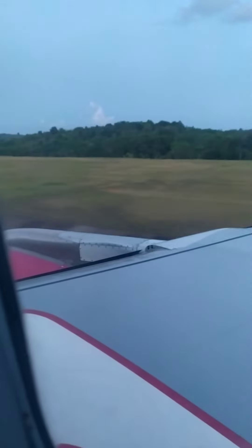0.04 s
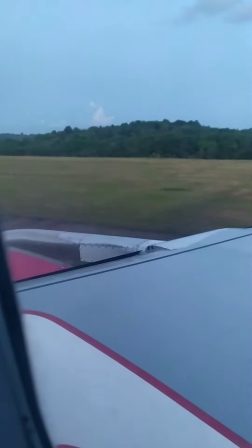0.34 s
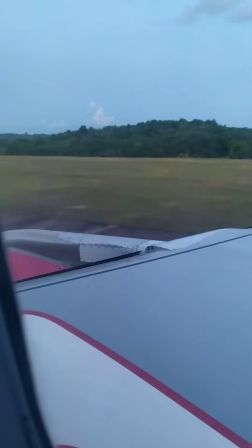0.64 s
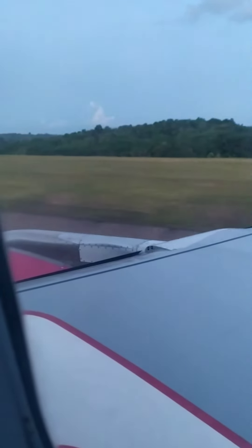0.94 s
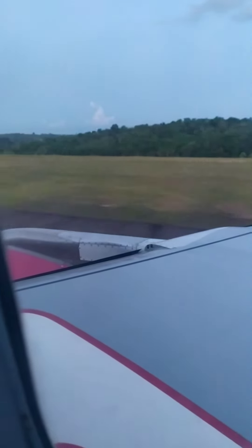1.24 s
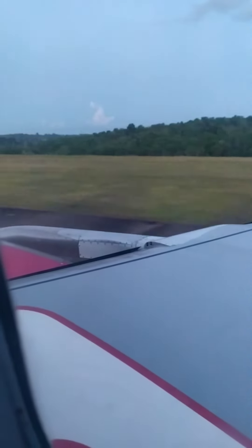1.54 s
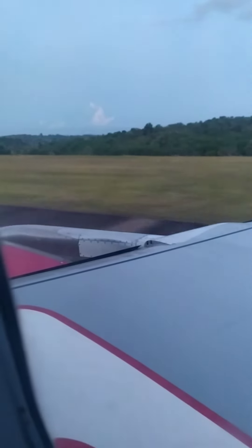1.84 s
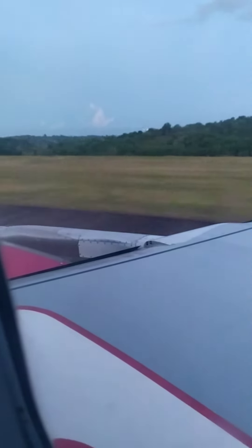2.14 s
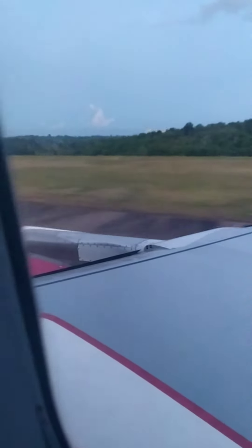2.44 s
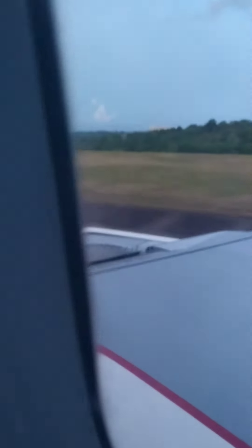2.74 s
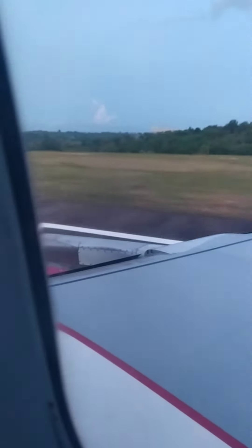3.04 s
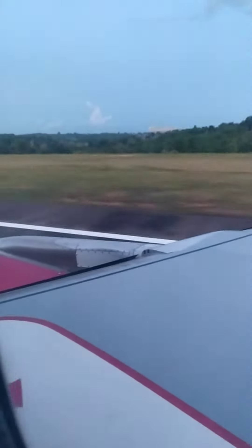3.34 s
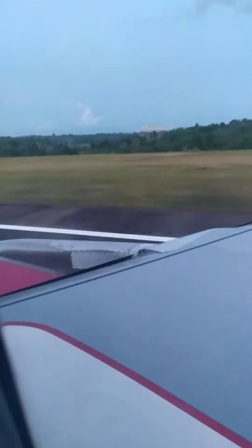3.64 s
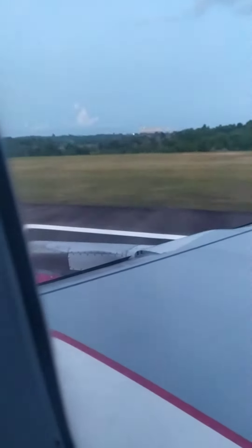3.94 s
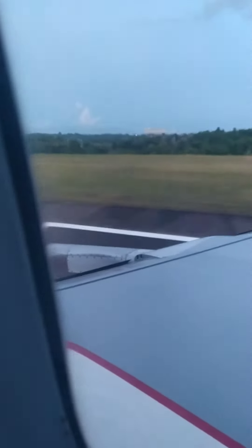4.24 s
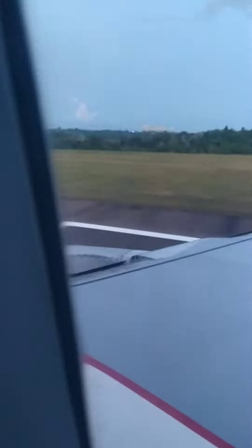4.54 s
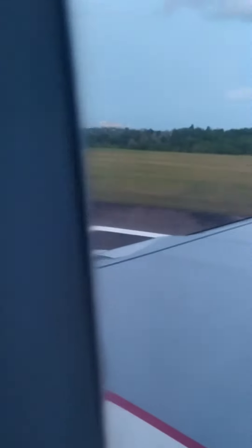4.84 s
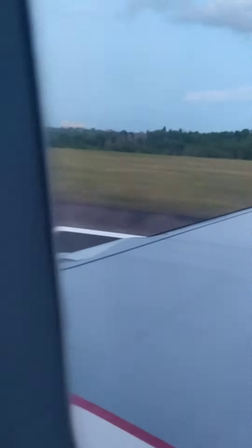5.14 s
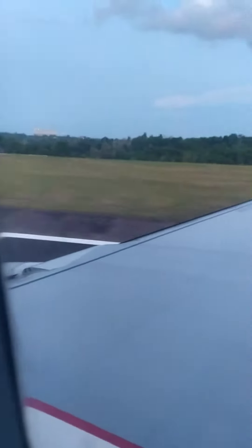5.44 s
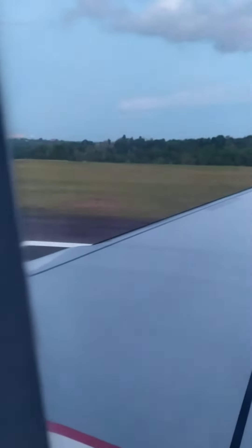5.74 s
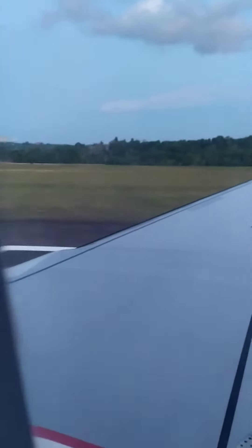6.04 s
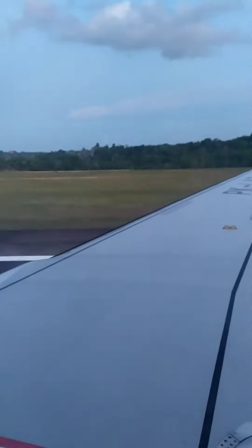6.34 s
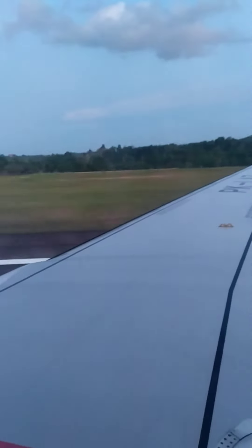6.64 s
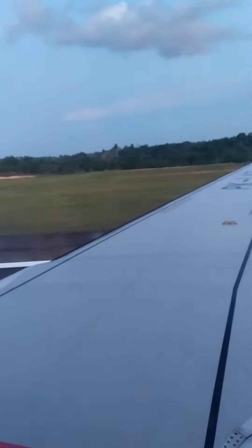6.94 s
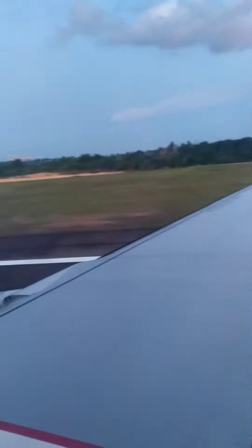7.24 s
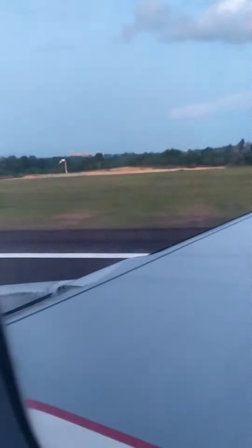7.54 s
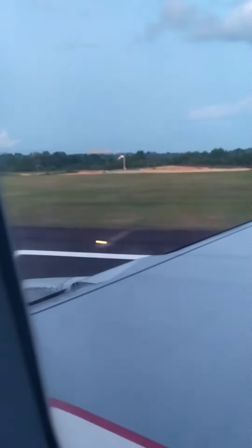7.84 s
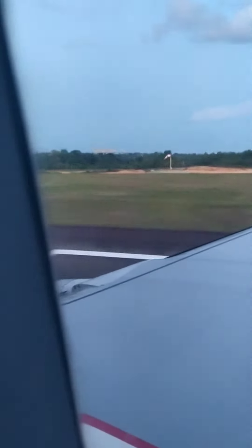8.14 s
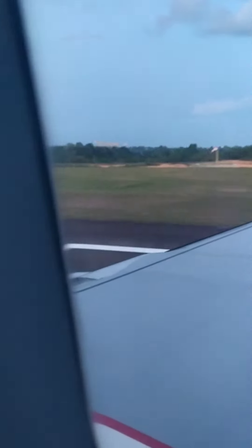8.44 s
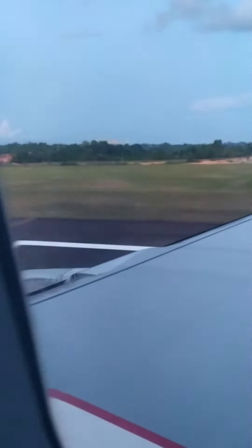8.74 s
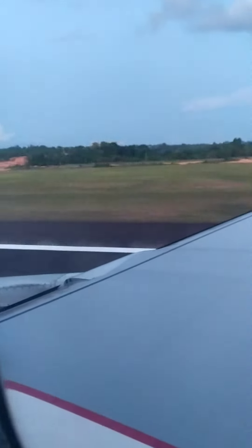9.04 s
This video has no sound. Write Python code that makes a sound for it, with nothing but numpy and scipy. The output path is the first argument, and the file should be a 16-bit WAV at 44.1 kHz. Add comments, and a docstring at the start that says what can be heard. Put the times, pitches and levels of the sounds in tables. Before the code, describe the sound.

Inside a jet airliner, a low cabin drone carries a faint whine of engine fans. After about two seconds the wheels touch down with a cluster of deep thumps and jolts. A louder runway rumble follows, with plastic trim rattling and knocking. The fan whine rises and the exhaust swells into a roar, while the microphone, at a seat over the wing, crackles slightly from overload.

```python
"""A steady cabin drone with whining engine fans, heard from a seat over the wing of a landing jet airliner.
The wheels touch down with jolts and thumps, the runway rumbles, and the plastic trim rattles and knocks.
Then the engines speed up and their exhaust swells into a roar. The plane's body shudders too deeply
to hear, but the shudder overloads the microphone, which crackles and chops up the treble."""
import sys
import numpy as np
from scipy import signal
from scipy.fft import rfft, irfft, next_fast_len
from scipy.io import wavfile
from scipy.ndimage import uniform_filter1d, minimum_filter1d, map_coordinates

SR = 44100
rng = np.random.default_rng(int(sys.argv[2]) if len(sys.argv) > 2 else 0)


def master(y):
    """Save y as 16-bit WAV."""
    cut = np.clip(np.atleast_2d(y).T, -1, 1)
    pcm = np.round(cut * 32767)  # scale
    wavfile.write(sys.argv[1], SR, pcm.astype(np.int16))


N = 409686
TIME = np.arange(N) / SR
LIGHT_LOAD_DB = -7  # weaker shaking until the plane's weight settles on the wheels


def amp(db):
    """Turns decibels into a number to multiply a sound by."""
    return 10 ** (np.asarray(db) / 20)


def unit(x):
    """Scales a signal to an average strength (rms) of one."""
    return x / np.sqrt(np.mean(x ** 2) + 1e-20)


def read(points, hz):
    """Looks up a spectrum table at any frequency, sliding between rows on a log-frequency scale."""
    row_hz, value = np.transpose(points)
    return np.interp(np.log(hz + 1), np.log(row_hz + 1), value)


def curves(rows):
    """Joins the rows of a time table with straight lines: one curve for each value column."""
    times, *columns = np.transpose(rows)
    return [np.interp(TIME, times, column) for column in columns]


def colour(x, points):
    """Turns each frequency of a sound up or down as a spectrum table says."""
    return irfft(rfft(x) * amp(read(points, np.fft.rfftfreq(x.shape[-1], 1 / SR))), x.shape[-1])


def waver(rate_hz):
    """A smooth random wobble of strength one, with rate_hz new values a second."""
    knots = rng.standard_normal(4096)
    wobble = map_coordinates(knots, [TIME[::64] * rate_hz], order=3, mode="wrap")
    return unit(wobble).repeat(64)[:N]


def swell(start, hold, rise, fall):
    """A loudness shape that rises, holds, then dies away; all times in seconds."""
    t = TIME - start
    return np.clip(t / rise, 0, 1) * np.exp(-np.maximum(t - hold, 0) / fall)


def add(mix, start, sound):
    """Mixes a short sound in at a start time in seconds."""
    part = mix[:, max(round(start * SR), 0):][:, :sound.shape[1]]
    part += sound[:, :part.shape[1]]


def air(gain):
    """Noise at two microphones, shaped by gain(hz): alike in the bass, unrelated in the treble."""
    # what differs between the microphones (side) against what they share (mid): (frequency [Hz], level [dB])
    width = [(60, -24), (110, -20.5), (200, -19.5), (380, -6), (700, -1.5), (1290, 3), (2380, -1.5),
             (4400, 1), (8120, 0), (15000, 1)]
    # how much louder the left is than the right: (frequency [Hz], level [dB])
    balance = [(60, -0.5), (110, 0.5), (200, -0.5), (380, 0.5), (700, -3), (1290, -2.5), (2380, 0.5),
               (4400, 2), (8120, 0.5), (15000, 2.5)]
    size = next_fast_len(N, real=True)
    hz = np.fft.rfftfreq(size, 1 / SR)
    mid, side = rfft(rng.standard_normal((2, size))) * gain(hz)
    side = side * amp(read(width, hz))
    lean = amp(read(balance, hz) / 2)
    pair = irfft(np.array([(mid + side) * lean, (mid - side) / lean]), size)[:, :N]
    return pair / pair.mean(0).std()


def noise(spectrum):
    """Stereo noise with the tone colour of a spectrum table."""
    return air(lambda hz: amp(read(spectrum, hz)))


def resonance(centre_hz, width_hz):
    """A narrow band of noise, like something shaken that rings near one pitch."""
    return air(lambda hz: 1 / (1 + ((hz - centre_hz ** 2 / (hz + 1)) / width_hz) ** 4))


def load(light_db, touchdown_s=2.31, settle_s=4.9, ramp_s=0.11):
    """How hard the wheels shake the plane: zero in the air, light at first, one once the weight settles."""
    rolling = np.clip((TIME - touchdown_s) / ramp_s, 0, 1)
    still_light = np.clip(1 - (TIME - settle_s) / ramp_s, 0, 1)
    return rolling * amp(light_db * still_light)


def cabin(drone_db=-16.5, hiss_db=-42, flutter_db=0.5):
    """Airflow and engines come through the cabin wall as a steady drone and a hiss."""
    # tone colour of the low drone: (frequency [Hz], level [dB])
    drone_colour = [(25, -26), (40, 1), (68, -1), (90, 1.5), (135, -1.5), (170, -3), (215, -9),
                    (280, -10.5), (380, -17), (460, -24), (520, -20.5), (600, -32), (800, -68),
                    (1300, -120)]
    # tone colour of the air hiss: (frequency [Hz], level [dB])
    hiss_colour = [(350, -37), (600, -3), (800, -3.5), (1000, -10.5), (1270, -15.5), (1450, -16.5),
                   (2070, -18), (2280, -21), (3400, -25), (4200, -22), (5200, -31), (9000, -31.5),
                   (12800, -39.5), (15500, -61)]
    drone = amp(drone_db) * noise(drone_colour)
    hiss = amp(hiss_db) * noise(hiss_colour)
    return drone + hiss * amp(flutter_db * waver(17))


def fans():
    """The engines' fan blades sing at a pitch that follows their speed; a pump and the vents whine too."""
    # the fans slow to idle, then speed up: (time [s], blade pitch [Hz])
    fan_speed = [(0, 435.5), (0.7, 427), (1.7, 414.8), (2.2, 410.4), (3.1, 409), (4.25, 409.2),
                 (4.45, 413.5), (4.68, 415.5), (5.0, 425), (5.95, 448.6), (7.1, 485.5), (7.5, 504)]
    # the blades' lowest tone: (time [s], level [dB])
    fan_tone = [(0, -31), (0.35, -36.5), (0.7, -26), (1.3, -36), (1.7, -32), (2.3, -34), (3.3, -43.5),
                (4.3, -53), (4.4, -32), (4.68, -33.5), (4.77, -39), (4.9, -35), (5.12, -38), (5.5, -60),
                (5.95, -38), (6.6, -47), (7.1, -30.5), (7.4, -60)]
    # tones at two and three times that pitch: (time [s], second tone [dB], third tone [dB])
    overtones = [(0, -45.5, -59), (0.7, -49, -59), (1.4, -45.5, -50), (2.2, -53, -59), (2.9, -45, -65),
                 (3.3, -46, -66), (3.9, -50, -67), (4.25, -44, -68), (4.5, -51, -68), (5.1, -49.5, -69),
                 (7.5, -66, -80)]
    # a pump's whine, which sags after touchdown: (time [s], pitch [Hz], level [dB])
    pump = [(0, 914, -50), (1, 915.5, -48), (2.6, 915.5, -47), (3.0, 908, -54), (3.25, 886, -48),
            (4.0, 890, -50), (5.5, 900, -58), (6.9, 915, -52), (7.5, 915, -52), (8, 915, -64)]
    # faint steady whines of the ventilation: (pitch [Hz], level [dB])
    whines = [(511.4, -48.5), (1550, -67.5), (1830, -69), (2751, -75), (3661, -74.5), (3741, -72.5),
              (3793, -73), (4167, -76)]
    blade_turns = np.cumsum(curves(fan_speed)[0]) / SR
    blade_levels = curves(fan_tone) + curves(overtones)
    pump_hz, pump_db = curves(pump)
    tones = [(k * blade_turns, db) for k, db in enumerate(blade_levels, 1)]
    tones += [(np.cumsum(pump_hz) / SR, pump_db)]
    tones += [(hz * TIME, db) for hz, db in whines]
    out = np.zeros((2, N))
    for turns, db in tones:
        angle = 2 * np.pi * turns + .12 * waver(14)
        mic_phase = rng.uniform(-.4, .4, (2, 1))  # the wave meets the two microphones out of step
        out += np.sqrt(2) * amp(db + waver(8)) * np.sin(angle + mic_phase)
    return out


def whistles(wobble=0.0043):
    """A squeak and brief whistles: unsteady tones that swell and fade."""
    # one tone a row: (time [s], length [s], pitch [Hz], level [dB])
    tones = [(2.435, 0.09, 3360, -51), (2.438, 0.083, 6600, -58), (6.994, 0.25, 1326, -49.5),
             (7.254, 0.26, 1322, -45.5)]
    out = np.zeros((2, N))
    for start, length, hz, db in tones:
        size = round(length * SR)
        turns = np.cumsum(hz * (1 + wobble * waver(150)[:size])) / SR
        add(out, start, amp(db) * np.sqrt(2) * np.sin(2 * np.pi * turns)[None] * np.hanning(size))
    return out


def wheels():
    """The wheels, suddenly set spinning, hum until the weight settles on them."""
    # loudness of the hum: (time [s], level [dB])
    hum = [(2.3, -70), (2.72, -34), (3.0, -44), (3.45, -33), (3.75, -42), (4.15, -35.5), (4.5, -60)]
    return amp(curves(hum)[0]) * resonance(centre_hz=344.3, width_hz=17)


def tyres(rough_db=2):
    """The tyres drum on the uneven runway, heard through the floor."""
    # loudness of the drumming: (time [s], level [dB])
    level = [(2.3, -46), (2.45, -22), (2.95, -42), (3.2, -35), (3.45, -29), (3.9, -33), (4.6, -30.5),
             (5.2, -31.5), (6, -32.5), (6.6, -28.5), (7.4, -28.5), (9.29, -19.5)]
    # its tone colour: (frequency [Hz], level [dB])
    tyre_colour = [(80, -33.5), (170, 4.5), (260, -11), (360, -10), (520, -12), (760, -19.5), (1100, -29),
                   (2200, -38.5), (6000, -52), (15000, -82)]
    return amp(curves(level)[0] + rough_db * waver(60)) * noise(tyre_colour)


def trim_rattle(chatter_db=2.1, tick_db=-6, ticks_per_s=100, spread_db=2.0, rustle_db=-52):
    """Shaken trim and seats rub and tick in fits, and rustle softly as long as the wheels roll."""
    # fits of rattling: (time [s], held for [s], level [dB])
    rattles = [(1.06, 0.21, -53.5), (2.36, 0.16, -47), (2.56, 0.11, -45.5), (2.705, 0.044, -39.5),
               (3.22, 0.23, -47), (4.02, 0.057, -47), (4.18, 0.041, -44), (4.34, 0.093, -45),
               (4.44, 0.25, -45), (4.9, 0.23, -55), (5.26, 0.33, -45.5), (6.07, 0.19, -45.5),
               (6.3, 0.39, -48.5), (7.56, 0.049, -47), (7.98, 0.03, -41.5)]
    # tone colour of the shaken trim: (frequency [Hz], level [dB])
    trim_colour = [(500, -22), (1200, -12), (2200, 7), (3200, 2.5), (4300, 2.5), (5600, 1), (6600, 2.5),
                   (8500, 4), (11000, 0.5), (13500, -5), (15800, -31)]
    rub = unit(rng.standard_normal((2, N)) * amp(chatter_db * waver(90)))
    clicks = (rng.random(N) < ticks_per_s / SR) * amp(spread_db * np.minimum(rng.exponential(1, N), 4))
    tick_tail = rng.standard_normal((2, 512)) * np.exp(-np.arange(512) / SR / 0.0023)
    ticks = unit(signal.oaconvolve(clicks[None], tick_tail, axes=1)[:, :N])
    fits = sum(amp(db) * swell(start, hold, rise=0.0066, fall=0.016) for start, hold, db in rattles)
    rustle = np.sqrt(load(LIGHT_LOAD_DB)) * amp(rustle_db - 2.5 * waver(21))
    return np.hypot(fits, rustle) * unit(colour(rub + amp(tick_db) * ticks, trim_colour))


def clatter(spectrum, length, rise):
    """A burst of noise that rises fast, then fades unevenly, by 60 dB in length seconds."""
    t = np.arange(16384) / SR
    contacts_db = 3 * np.interp(t, t[::128], rng.standard_normal(128))
    shape = (1 - np.exp(-t / rise)) * amp(-60 * t / max(length, .005) + contacts_db)
    return unit(colour(rng.standard_normal((2, len(t))), spectrum)) * shape


def knocks_and_crackles():
    """Sharp clicks with a hollow body: panel knocks, and small crackles as the microphone overloads."""
    # one knock or crackle a row: (time [s], click level [dB], body against click [dB], length [s])
    clicks = [(0.99, -53, 14, 0.08), (1.11, -36, -11, 0.1), (2.4, -47.5, 1, 0.2), (2.575, -33.5, -4, 0.068),
              (2.614, -39, -1, 0.14), (2.714, -22, -13, 0.038), (2.767, -54, 7, 0.078),
              (2.913, -34.5, 7.5, 0.051), (3.115, -50.5, 16, 0.043), (3.366, -35, -12, 0.08),
              (3.417, -38, -10, 0.067), (3.47, -50, 8, 0.11), (3.994, -37.5, -2, 0.092),
              (4.122, -34, -9, 0.04), (4.467, -36, 5, 0.14), (4.564, -41, 7, 0.026),
              (4.583, -33.5, 7, 0.048), (4.724, -32.5, 7, 0.055), (4.923, -43, 8.5, 0.09),
              (4.954, -46, 7, 0.04), (4.983, -42, 12, 0.07), (5.003, -28.5, 3.5, 0.11),
              (5.039, -43, 9, 0.036), (5.085, -28.5, 3.5, 0.041), (5.127, -44, 1, 0.04),
              (5.213, -35, 8, 0.032), (5.457, -27.5, 5, 0.07), (5.537, -29.5, -1, 0.11),
              (5.562, -34.5, 6.5, 0.08), (5.64, -39, 4, 0.033), (5.765, -43.5, 10.5, 0.096),
              (5.872, -39.5, 10.5, 0.045), (6.069, -36, 3, 0.03), (6.178, -39, -2, 0.081),
              (6.299, -38, 3.5, 0.045), (6.324, -36, 1.5, 0.1), (6.405, -36, -2, 0.05),
              (6.515, -46, 13, 0.08), (6.541, -38.5, 9, 0.13), (6.881, -40, 10, 0.047),
              (7.015, -37, 7, 0.04), (7.154, -43, 7, 0.03), (7.663, -49, 11, 0.035), (7.676, -47, 6, 0.023),
              (7.701, -37, 12.5, 0.036), (7.732, -45, 7, 0.04), (8.685, -40, 9, 0.074),
              (8.832, -32, -14, 0.05)]
    # tone colour of the click: (frequency [Hz], level [dB])
    click_colour = [(1500, -19), (4100, 4.5), (5400, -0.5), (6400, 0.5), (8500, 5), (11000, -0.5),
                    (13000, -2), (15800, -16)]
    # tone colour of the body: (frequency [Hz], level [dB])
    body_colour = [(400, -7), (900, 5.5), (1130, 14.5), (1430, 4), (1880, 4.5), (2400, -0.5), (3100, -6.5),
                   (3900, -5.5), (5200, -7), (6300, -4), (15000, -58)]
    out = np.zeros((2, N))
    for start, db, body_db, length in clicks:
        click = clatter(click_colour, length, rise=0.0012)
        body = clatter(body_colour, length, rise=0.00064)
        add(out, start, amp(db) * (click + amp(body_db) * body))
    return out


def gear_jolts():
    """The landing gear jolts the floor with dull blows."""
    # the blows: (time [s], level [dB], length [s])
    jolts = [(2.398, -15.5, 0.17), (2.448, -12, 0.13), (2.505, -22.5, 0.47), (2.679, -16.5, 0.27),
             (2.717, -15, 0.25), (2.768, -12, 0.21), (3.119, -21, 0.13), (3.32, -11.5, 0.15),
             (3.407, -17.5, 0.15), (3.472, -12.5, 0.13), (3.494, -17, 0.12), (3.583, -19.5, 0.17),
             (3.633, -19.5, 0.17), (4.461, -26, 0.2), (5.001, -21, 0.31), (5.455, -26, 0.21),
             (6.535, -15.5, 0.17)]
    # their tone colour: (frequency [Hz], level [dB])
    jolt_colour = [(60, -20), (150, 14), (230, 4), (350, 11), (550, -1.5), (720, 0.5), (880, -7),
                   (1220, -11.5), (1500, -18.5), (2200, -23), (4000, -34), (9000, -53)]
    out = np.zeros((2, N))
    for start, db, length in jolts:
        add(out, start, amp(db) * clatter(jolt_colour, length, rise=0.0035))
    return out


def thumps(peak_s=0.019):
    """As the landing gear takes the weight, each shove swings the cabin floor for a few cycles."""
    # the deep thumps: (time [s], peak level [dB], pitch [Hz])
    shoves = [(2.437, -5.5, 89.5), (2.53, -7, 70.4), (2.706, -4.5, 86), (2.76, -5.5, 67), (2.917, -5.5, 80),
              (3.28, -9, 107.6), (3.795, -8.5, 81.7), (4.03, -11.5, 81), (4.11, -10, 74.5),
              (4.196, -7.5, 90.6), (4.297, -6, 89.6)]
    out = np.zeros((2, N))
    t = np.arange(8192) / SR
    shape = t / peak_s * np.exp(1 - t / peak_s)
    for start, db, hz in shoves:
        add(out, start, amp(db) * shape * np.sin(2 * np.pi * hz * t)[None])
    return out


def runway(low_db=-15, high_db=-12.5):
    """The rolling wheels make the plane's body boom at two deep pitches."""
    # heavy loads on the gear that swell the lower boom: (time [s], held for [s], level [dB])
    bumps = [(2.7, 0.15, -12), (3.08, 0.083, -18), (4.8, 0.39, -10), (6.12, 0.5, -13.5), (6.74, 0.49, -14),
             (8.25, 0.46, -14.5)]
    swells = sum(amp(db) * swell(start, hold, rise=0.022, fall=0.077) for start, hold, db in bumps)
    low = np.hypot(amp(low_db) * load(LIGHT_LOAD_DB), swells) * resonance(centre_hz=54.8, width_hz=25.4)
    high = amp(high_db) * load(light_db=-3) * resonance(centre_hz=90.6, width_hz=44)
    return low + high


def shudder():
    """The plane's body heaves at a wandering rate, pumping the cabin air too slowly to hear."""
    # strength of the ongoing sway: (time [s], peak level [dB])
    level = [(2.3, -27), (2.7, -13), (3.6, -16), (4.78, -9), (4.85, 0), (4.92, -0.5), (4.96, -2.5),
             (5.01, -5), (5.05, 0.5), (5.11, -4), (5.17, 0), (5.27, -9), (6.3, -8), (6.45, -6), (6.55, -16),
             (6.72, -5.5), (7.1, -5), (7.5, -2.5), (7.7, -9), (8.05, -5), (8.4, -1), (9.29, -2.5)]
    # single hard heaves: (time [s], peak level [dB], frequency [Hz])
    heaves = [(4.727, 3.5, 19), (4.963, -1, 16), (5.115, -2, 16), (7.667, -1, 24), (7.705, 0.5, 17)]
    rate_hz = 23 + 3.2 * waver(30)
    sway = amp(curves(level)[0] + waver(20)) * np.sin(2 * np.pi * np.cumsum(rate_hz) / SR)
    for centre, db, hz in heaves:
        turns = (TIME - centre) * hz
        sway += amp(db) * np.sin(2 * np.pi * turns) * np.exp(-2 * turns ** 2)
    return sway


def roar(bursts_per_s=230, sharpness=2.6, spread_db=1.1):
    """The swirling exhaust, reversed to brake, swells with the thrust; its middle band tears into bursts."""
    # the roar grows as the engines speed up: (time [s], level [dB])
    level = [(0, -59), (5.5, -19.5), (6.6, -22.5), (7.2, -17), (7.8, -13), (8.15, -9.5), (8.33, -6),
             (8.8, -7.5), (9.29, -6)]
    # its tone colour: (frequency [Hz], level [dB])
    roar_colour = [(45, -6), (110, 10), (220, 1), (400, -10.5), (600, -19.5), (900, -26), (1400, -38),
                   (2500, -50), (4500, -56), (9000, -77), (15000, -89)]
    jet = amp(curves(level)[0]) * noise(roar_colour)
    middle = signal.sosfiltfilt(signal.butter(2, (400, 5000), "bandpass", fs=SR, output="sos"), jet)
    opening = amp(-11) + 1 + np.tanh(sharpness * waver(bursts_per_s))  # never shuts completely
    bursts = unit(opening * amp(spread_db * waver(bursts_per_s / 2)))
    return jet + middle * (bursts - 1)  # swaps the smooth middle band for the ragged one


def scene():
    """Everything heard at the seat."""
    lean_left = amp([[0.5], [-0.5]])
    rattles = (trim_rattle() + gear_jolts() + knocks_and_crackles()) * lean_left
    background = cabin() + fans() + whistles()
    landing = runway() + thumps() + wheels() + tyres()
    return background + rattles + landing + roar() + shudder()


def record(dry, overload=0.86, low_cut_hz=38.5, drive_db=0.5, ceiling=0.71, top_hz=15800):
    """The microphone overloads on big heaves; filters trim both ends of the range, a limiter tames peaks."""
    flattened = dry / (1 + (dry / overload) ** 40) ** (1 / 40)  # loses the treble riding on each big wave
    x = .14 * dry + .86 * flattened
    low_cut = signal.butter(14, low_cut_hz, "highpass", fs=SR, output="sos")  # hides the heave itself
    x = signal.sosfilt(low_cut, x) * amp(drive_db)
    limiter_gain = minimum_filter1d(np.minimum(1, ceiling / (abs(x).max(0) + 1e-9)), size=257)
    x = x * uniform_filter1d(uniform_filter1d(limiter_gain, size=129), size=129)
    high_cut = signal.firwin(511, top_hz, window=("kaiser", 9), fs=SR)
    return signal.oaconvolve(x, high_cut[None], "same")


dry = scene()
out = record(dry)
master(out)
```